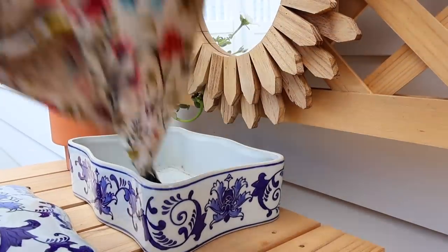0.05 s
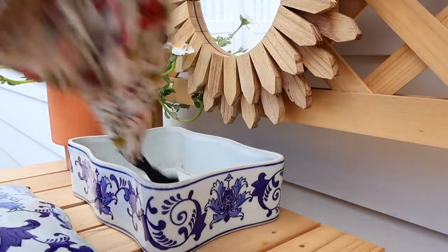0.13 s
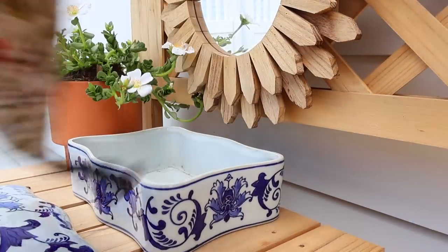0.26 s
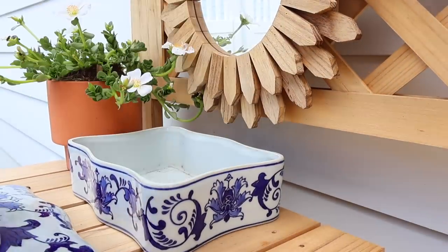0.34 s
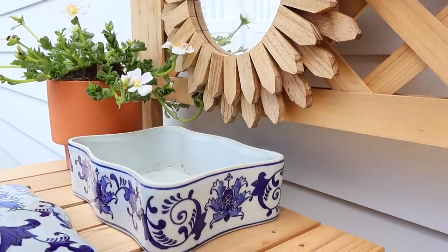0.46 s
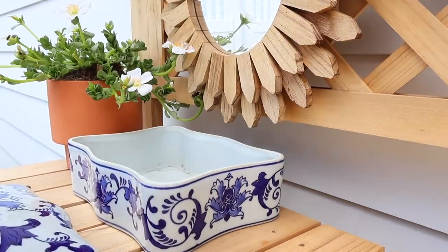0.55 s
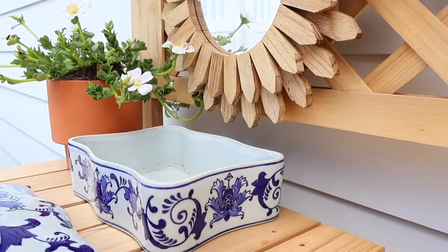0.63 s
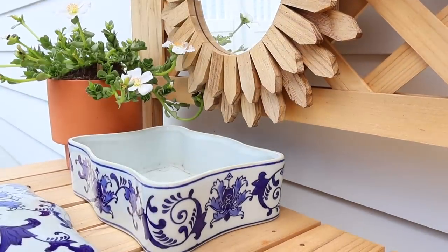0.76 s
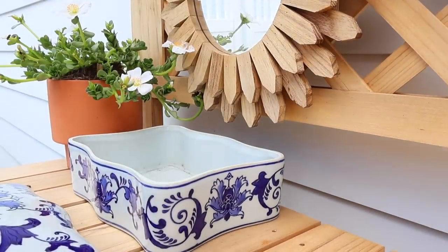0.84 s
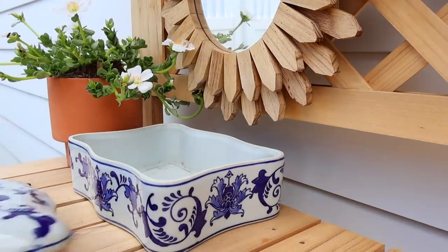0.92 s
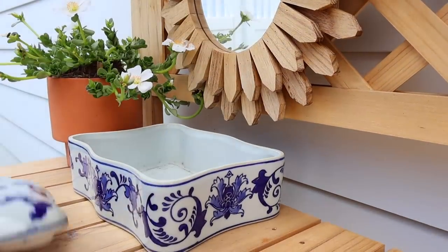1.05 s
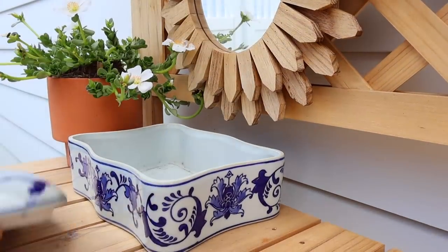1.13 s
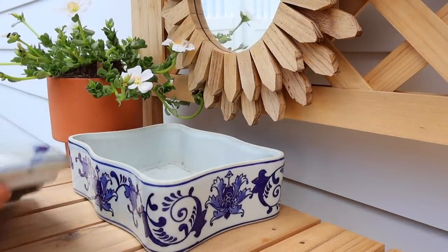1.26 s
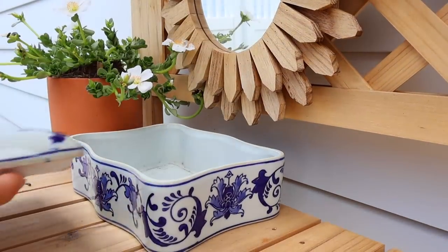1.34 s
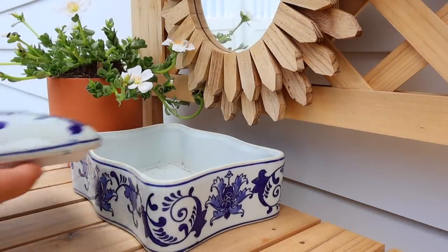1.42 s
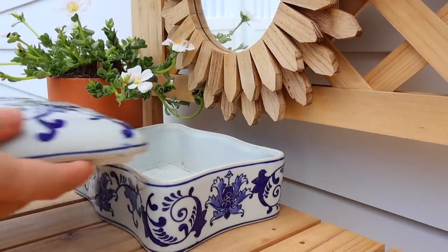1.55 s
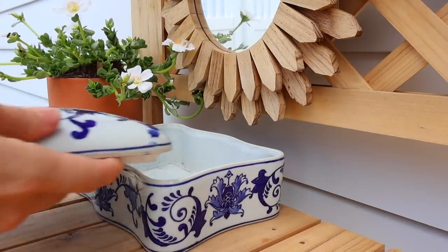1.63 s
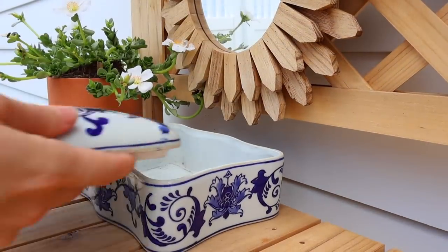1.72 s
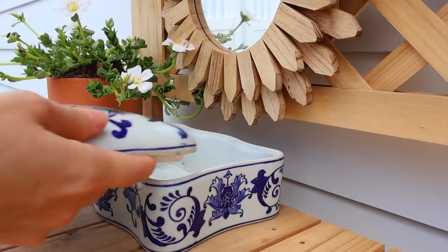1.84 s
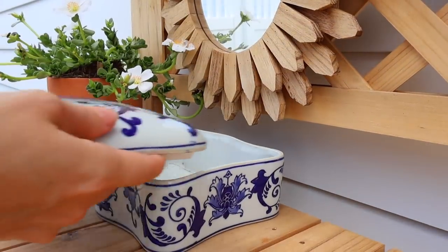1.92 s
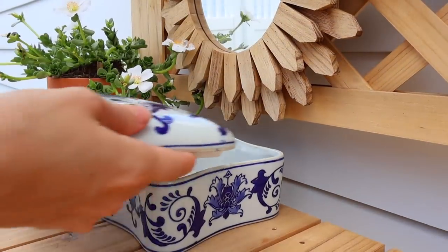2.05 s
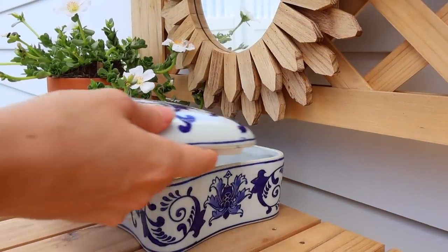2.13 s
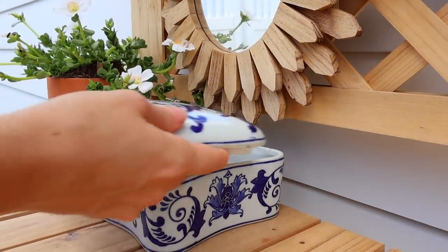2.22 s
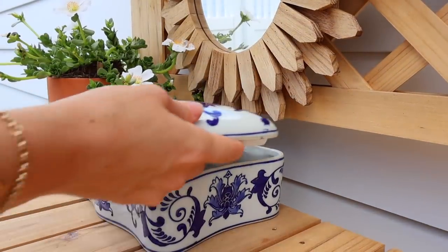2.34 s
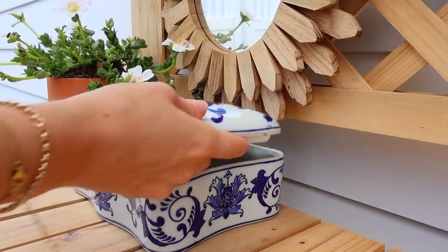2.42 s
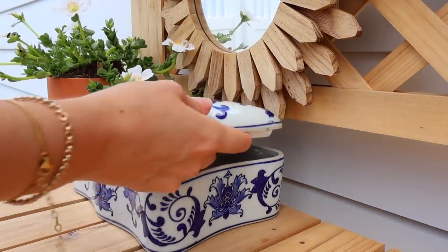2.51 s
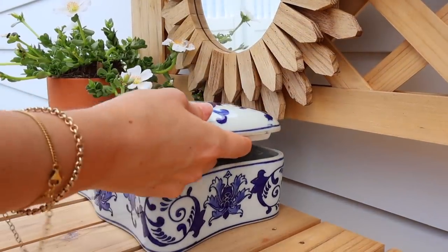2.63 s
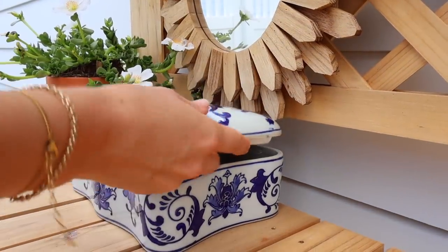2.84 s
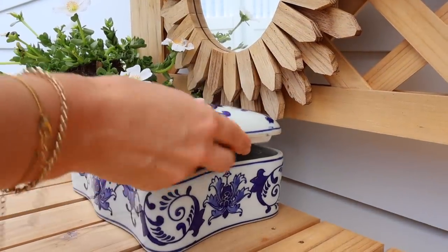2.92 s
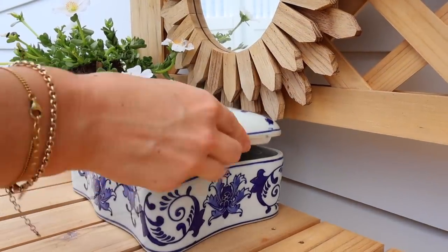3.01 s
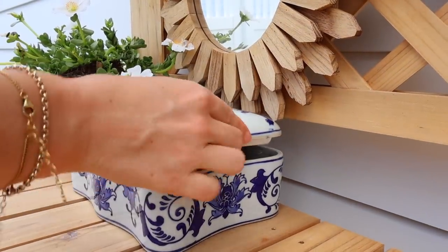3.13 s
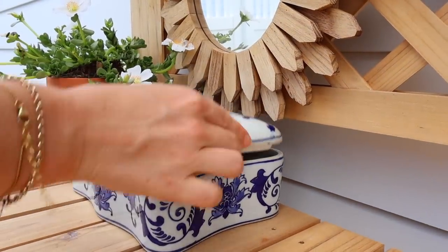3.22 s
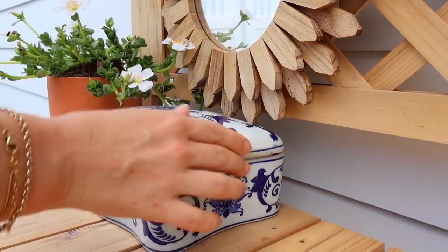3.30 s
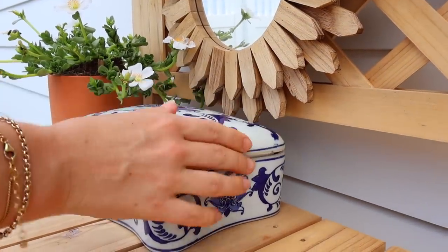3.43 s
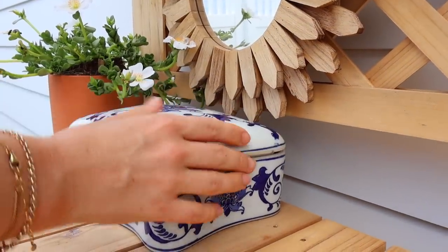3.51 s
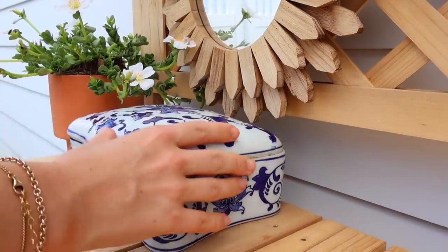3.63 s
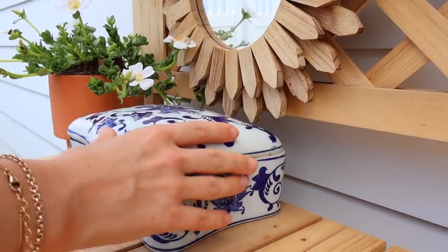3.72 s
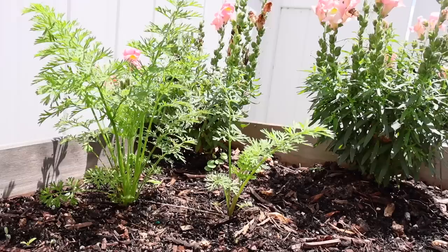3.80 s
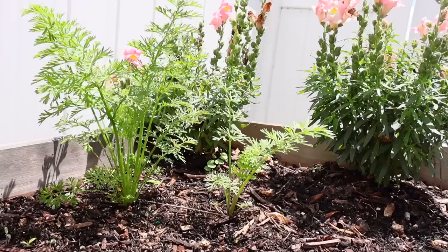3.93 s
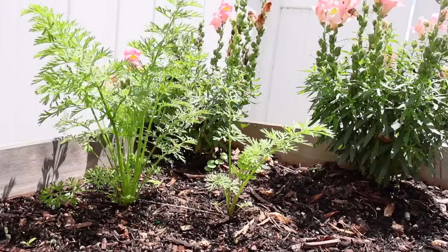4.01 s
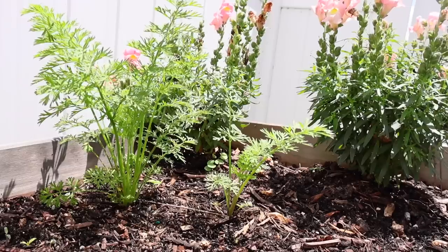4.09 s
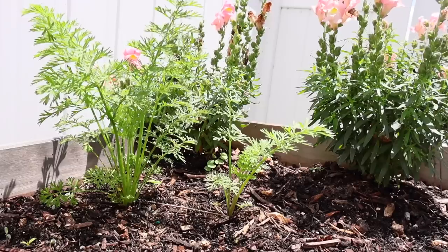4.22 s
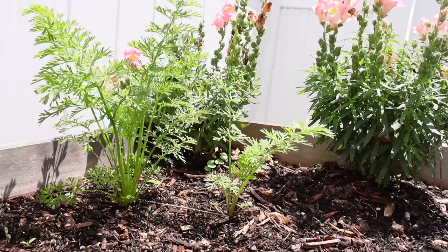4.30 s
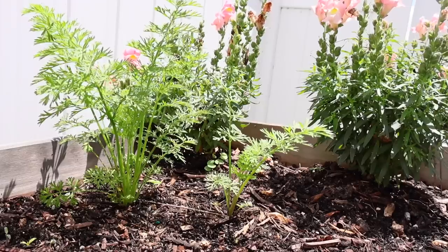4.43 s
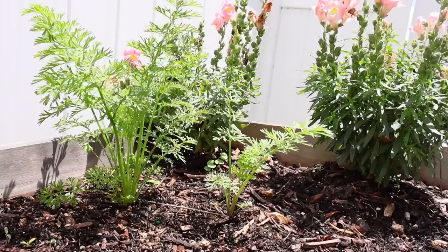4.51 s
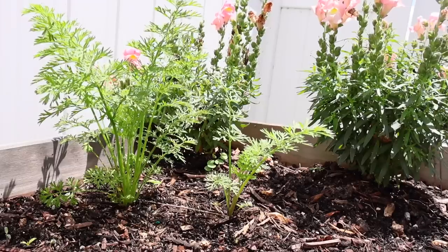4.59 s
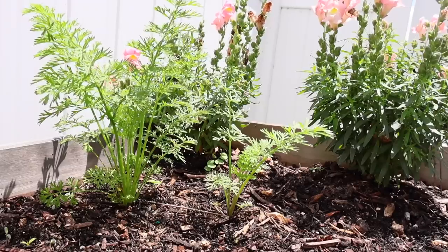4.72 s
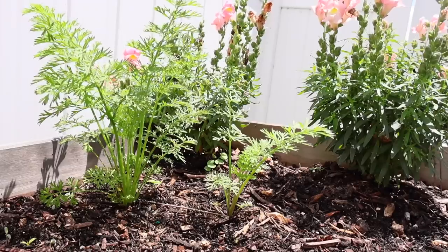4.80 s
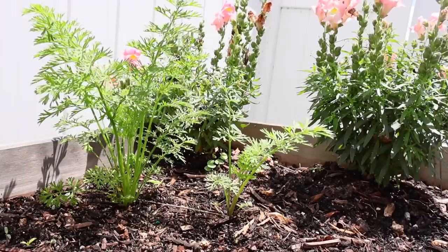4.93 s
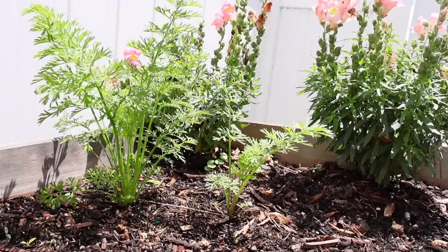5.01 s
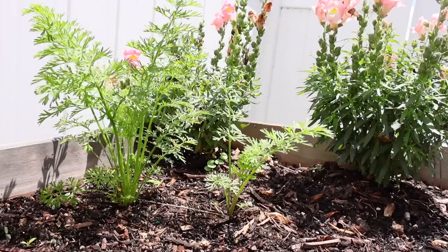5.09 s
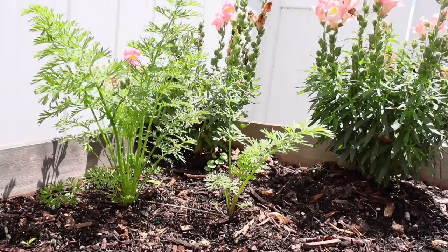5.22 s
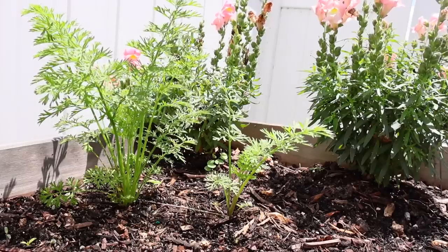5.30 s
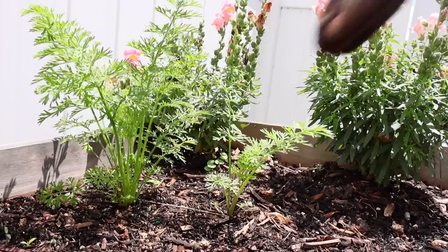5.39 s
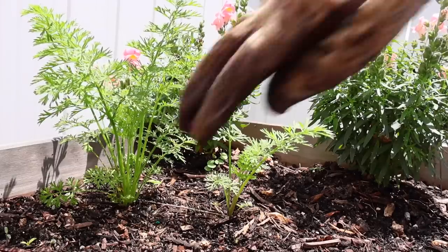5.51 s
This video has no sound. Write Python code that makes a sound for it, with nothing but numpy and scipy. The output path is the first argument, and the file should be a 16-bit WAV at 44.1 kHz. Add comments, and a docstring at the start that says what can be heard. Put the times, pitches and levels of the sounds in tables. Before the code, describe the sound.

Outdoors and close up, the air is very quiet at first, with tiny scuffs and faint ceramic ticks in the first half second. Around 0.9-1.3 s, dry soft scuffs and low bumps come from the wooden table as the lid is picked up, with weak taps near 1.4-1.5 s. At 1.7 s a loud, bright clink rings briefly, followed by a thin scrape and a light tap. Small knocks return from 2.5 s; strong double clacks hit near 2.9 s, then short gritty rim scrapes run on, slightly hollow. A heavy knock lands at 3.3 s, with more grating, and the lid clatters into its seat around 3.55-3.6 s, thumping the boards. Extremely faint, high, long chime notes linger far behind. At about 3.8 s the background switches abruptly to louder, steady garden air with a low distant drone around 90 Hz. From 5.4 s a barely audible dry rustle joins.

```python
"""A ceramic box on a wooden garden table: its lid clinks on the rim, scrapes along it in short strokes
and drops into its seat. Each contact rings decaying modes of box, lid and rim and thumps the table boards.
Trains of tiny slips drive the scrapes, and the dry scuffs of hand, tool and lid on the boards.
Behind it lies shaped noise of quiet garden air with a far chime of long sine notes; then comes
the louder air of a flower bed with a stronger distant drone and a last faint rustle of dense slips."""
import sys
import numpy as np
from scipy import signal
from scipy.fft import rfft, irfft, next_fast_len
from scipy.io import wavfile
from scipy.ndimage import uniform_filter1d, minimum_filter1d, map_coordinates

SR = 44100
rng = np.random.default_rng(int(sys.argv[2]) if len(sys.argv) > 2 else 0)


def digitize_waveform(pressure):
    """Quantize a signal to 16-bit integers and store it at the path in sys.argv[1].

    Rows of a 2-D input are taken as channels; values are limited to [-1, 1].
    """
    field = np.atleast_2d(pressure).T
    bounded = np.clip(field, -1, 1)
    quanta = np.round(bounded * 32767).astype(np.int16)
    wavfile.write(sys.argv[1], SR, quanta)


N = 244755

# Frequency ranges of a contact, in the order knock, clack, ring, sparkle: (low edge [Hz], high edge [Hz])
CONTACT_RANGES = [(280, 800), (800, 2500), (2500, 9000), (9000, 16000)]
# Modes of the air and walls of the nearly closed box: (frequency [Hz], relative level [dB], t60 [s])
HOLLOW_MODES = [(365, -7, .07), (402, 0, .09), (440, -9, .07)]
# The lid moves over the opening: (time [s], share covered [0-1])
LID_COVER = [(1.68, 0), (2.63, .45), (2.88, .6), (3.32, .8), (3.6, 1)]


def amp(db):
    """Level and amplitude: 20 dB are a factor of ten in gain."""
    return 10 ** (np.asarray(db) / 20)


def unit(x):
    """Normalization: divide by the root mean square, so that the rms is 1."""
    return x / np.sqrt(np.mean(x ** 2) + 1e-20)


def opening(x, size):
    """Normalization of a decaying sound: its first samples get rms 1."""
    return x / np.sqrt(np.mean(x[:, :size] ** 2) + 1e-20)


def along(points, hz):
    """Logarithmic frequency scale: (frequency [Hz], value) points joined by straight lines on a log axis."""
    f, v = np.transpose(points)
    return np.interp(np.log(hz + 1), np.log(f + 1), v)


def wobble(rate):
    """Slow fluctuation: a smooth curve through random knots, rate of them a second."""
    knots = rng.standard_normal(int(N * rate / SR) + 4)
    return map_coordinates(knots, [np.arange(N) * rate / SR])


def filtered(x, response):
    """Linear filtering: the spectrum is multiplied by a complex response of frequency."""
    size = x.shape[-1]
    padded = next_fast_len(size + 4096)
    hz = np.fft.rfftfreq(padded, 1 / SR)
    return irfft(rfft(x, padded) * response(hz), padded)[..., :size]


def band(x, edges, order=5):
    """Band-pass filtering: a causal Butterworth filter keeps what lies between the edges [Hz]."""
    return signal.sosfilt(signal.butter(order, edges, 'band', fs=SR, output='sos'), x)


def ports(x, lag_ms=0.037):
    """Interaural-like delay: a phase proportional to frequency lets the left channel lead the right."""
    lag = lag_ms / 1000
    lead = np.array([[1], [-1]])  # each channel is shifted by half the lag
    return filtered(x, lambda hz: np.exp(1j * np.pi * hz * lag * lead))


def add(track, s, sound):
    """Superposition: mix a stereo sound into the track at s seconds."""
    start = round(s * SR)
    track[:, start:start + sound.shape[1]] += sound


def air(spectrum, waver_db):
    """Diffuse noise: shaped random pressure, more alike left and right in the bass, wavering in level."""
    # Likeness of left and right: (frequency [Hz], correlation [0-1])
    likeness = [(60, 0.74), (180, 0.24), (550, 0.13), (1650, 0.19), (4970, 0.15), (15000, 0.33)]

    def response(hz):
        turn = np.arccos(np.clip(along(likeness, hz), -1, 1)) / 2  # mid-side angle giving this correlation
        return amp(along(spectrum, hz)) * [np.cos(turn), np.sin(turn)]

    mid, side = filtered(rng.standard_normal((2, N)), response)
    return unit(np.array([mid + side, mid - side])) * amp(waver_db * wobble(2))


def garden(drone_hz=90, drone_width_hz=7):
    """Superposed backgrounds: air, drone and chime by the table, then the louder air and drone of the bed."""
    # Spectra of the air by the table and at the flower bed: (frequency [Hz], relative density [dB per Hz])
    porch_spectrum = [(15, -45), (25, -9.5), (53, -9), (70, -4), (123, -2), (184, -10.5), (691, -16.5),
                      (749, -18), (1040, -18), (2150, -28), (2590, -24.5), (2970, -28.5), (15800, -37)]
    bed_spectrum = [(15, -42), (25, -11.5), (53, -14.5), (76, -10), (91, -3), (116, -13), (161, -13),
                    (189, -12.5), (222, -17), (791, -22.5), (2200, -32.5), (2390, -33.5), (4210, -36),
                    (14600, -42), (15800, -46)]
    move_s, crossfade_s = 3.83, 0.0078
    moved = np.clip((np.arange(N) / SR - move_s) / crossfade_s, 0, 1)
    resonance = lambda hz: 1 / (1 + ((hz - drone_hz) / drone_width_hz) ** 2)
    drone = unit(filtered(rng.standard_normal(N), resonance))
    porch = amp(-56.66) * air(porch_spectrum, waver_db=1.25) + amp(-70.5) * drone + chime()
    bed = amp(-49.75) * air(bed_spectrum, waver_db=0.37) + amp(-50) * drone
    return (1 - moved) * porch + moved * bed


def modes(table, t, spread):
    """Modal synthesis: decaying sines in stereo, with slightly new strengths and phases at every blow."""
    hz, db, t60 = np.transpose(table)[:, :, None]
    level, side, phase = rng.standard_normal((3, len(table), 1))
    ring = amp(db + level - 60 * t / t60) * np.sin(2 * np.pi * (hz * t + phase))
    return ring.sum(0) + spread * (side * ring).sum(0) * np.array([[1], [-1]])


def ceramic(lid_share, rim_share, clatter_db, width=0.4):
    """Modal density: sparse clear modes of box, lid and rim stand over a clatter of fast-decaying noise."""
    # Modes of the box walls, of the lid and of the lightly touched rim:
    # (frequency [Hz], relative level [dB], t60 [s])
    box_modes = [(716, -4, .09), (1352, 5, .075), (1712, -4, .11), (2000, -1, .08), (2078, -1, .13),
                 (2487, -2, .07), (2729, 1, .08), (2912, -2, .1), (3634, -5, .06), (3920, -5, .08),
                 (4151, -5, .09), (4280, -4, .08), (4603, -4, .07), (5464, -9, .07), (6013, -5, .08),
                 (7704, -9, .08)]
    lid_modes = [(1105, 0, .08), (1170, 1, .07), (2103, 2, .11), (2262, -1, .1), (2915, -7, .11),
                 (3095, -5, .08), (3190, -3, .14), (3913, -1, .15), (4533, 6, .1), (4760, -6, .13),
                 (5031, 3, .1), (5817, -1, .155), (6503, -2, .085), (6991, 7, .12), (7483, -6, .1),
                 (8608, -12, .13), (9857, -9, .1), (10760, -12, .11)]
    rim_modes = [(2912, -2, .16), (4151, -2, .14), (4592, 3, .15), (5480, -3, .19), (5814, -3, .11),
                 (7499, -2, .15), (7709, -3, .13), (8446, 2, .11)]
    # Spectrum of the clatter: (frequency [Hz], relative density [dB per Hz])
    clatter_spectrum = [(250, 2), (480, 1.5), (620, 3.5), (1150, -0.5), (2200, -7), (3100, 0.5), (3500, -3),
                        (4500, 0), (7000, -8), (9000, -8), (12500, -18.5), (15000, -13)]
    # Decay of the clatter: (frequency [Hz], t60 [s])
    clatter_decay = [(300, 0.19), (700, 0.052), (2000, 0.11), (6000, 0.12), (15000, 0.091)]
    free_rim_db, free_lid_db = 13.5, 3  # a freely ringing rim or lid has this much less clatter
    t = np.arange(SR // 3) / SR
    ring = np.zeros((2, len(t)))
    box_share = max(1 - lid_share - rim_share, 0)
    for share, table in [(box_share, box_modes), (lid_share, lid_modes), (rim_share, rim_modes)]:
        ring += np.sqrt(share) * modes(table, t, spread=0.35)

    hz, age, noise = signal.stft(rng.standard_normal((2, len(t))), SR, nperseg=128)
    fade_db = along(clatter_spectrum, hz)[:, None] - 60 * age / along(clatter_decay, hz)[:, None]
    mid, side = signal.istft(noise * amp(fade_db), SR, nperseg=128)[1][:, :len(t)]
    clatter = np.array([mid + width * side, mid - width * side])
    clear_db = free_rim_db * rim_share + free_lid_db * lid_share ** 2
    return ring + amp(clatter_db - clear_db) * clatter


def boards(centre_hz, focus_db=9, rise=0.0069):
    """Plate resonance: modes nearest centre_hz answer most (focus_db less per octave away) and swell in."""
    # Modes of the table boards:
    # (nominal frequency [Hz], relative level [dB], t60 [s], left gain [factor], right gain [factor])
    board_modes = [(55.43, -8.5, 0.38, 0.7, 0.5), (78, -4, 0.27, 0.31, 0.99), (98.14, 2, 0.4, 0.81, -0.27),
                   (116.8, -1.5, 0.33, 0.95, -0.29), (149.6, 0, 0.29, 0.018, 1), (200, 2, 0.18, 0.32, 0.68),
                   (247.7, 2.5, 0.21, .55, 0.9), (282.1, 2.5, .18, 0.57, 0.95)]
    t = np.arange(SR // 2) / SR
    out = np.zeros((2, len(t)))
    for hz, db, t60, left, right in board_modes:
        level, detune, phase = rng.standard_normal(3)
        drive_db = db + level - focus_db * abs(np.log2(hz / centre_hz))
        wave = np.sin(2 * np.pi * (hz * (1 + 0.023 * detune) * t + phase))
        out += np.outer([left, right], amp(drive_db - 60 * t / t60) * wave)
    return out * (1 - np.exp(-t / rise))


def slips(rate, spread_db, clump_db):
    """Stick-slip friction: a random train of tiny slips of uneven size that come in clumps, rms 1."""
    chance = rng.random(N)
    size = np.clip(rng.standard_normal(N), -2, 2)
    strength = amp(spread_db * size + clump_db * wobble(45))
    return unit((chance < rate / SR) * strength * rng.choice([-1, 1], N))


def strokes(table):
    """Friction envelopes of rubbing and table judder: each stroke takes hold, swells a little and dies away."""
    attack_s, swell_db_per_s = 0.016, 11  # the hand presses a little harder as a stroke goes on
    rub_release_s, judder_release_s = 0.13, 0.23  # time to fall 60 dB once the stroke stops
    now = np.arange(N) / SR
    rub, judder = np.zeros((2, N))
    for s, length, db, judder_db in table:
        age = now - s
        swell_db = swell_db_per_s * (np.clip(age, 0, length) - length / 2)
        press = np.clip(age / attack_s, 0, 1) * amp(swell_db)
        after = np.clip(age - length, 0, 1)
        # overlapping strokes add in power
        rub = np.hypot(rub, press * amp(db - 60 * after / rub_release_s))
        judder = np.hypot(judder, press * amp(judder_db - 60 * after / judder_release_s))
    return rub, judder


def scuffing():
    """Dense friction: dry slips too close together to tell apart make a shaped noise, rms 1."""
    # Spectrum of scuffing on wood, cloth and leaves: (frequency [Hz], relative density [dB per Hz])
    scuff_spectrum = [(1500, 4), (2500, -8.5), (3300, 0.5), (5500, -2.5), (8000, -6.5), (10000, -9),
                      (15000, -21)]
    dense = slips(rate=4400, spread_db=1.5, clump_db=1.5)
    return unit(filtered(dense, lambda hz: amp(along(scuff_spectrum, hz))))


def rubbed(body, edges, count=3):
    """Convolution: slips excite several spots of the edge, each with its own impulse response, rms 1."""
    out = np.zeros((2, N))
    for _ in range(count):
        ring = band(body(), edges, order=3)
        force = slips(rate=170, spread_db=4.5, clump_db=2)
        out += signal.oaconvolve(force[None], ring / np.linalg.norm(ring), axes=1)[:, :N]
    return unit(out)


def hollowness(s):
    """Cavity resonance: the air in the box resounds most when only a gap is left at time s, 0-1."""
    best_cover, width = 0.79, 0.2
    cover = np.interp(s, *np.transpose(LID_COVER))
    return np.exp(-((cover - best_cover) / width) ** 4)


def grinding():
    """Coupled wall and cavity modes: the low rubbing, with more of the air inside as the gap narrows."""
    t = np.arange(SR // 3) / SR
    walls = rubbed(lambda: ceramic(0.65, 0, clatter_db=16.5), (280, 2400), count=2)
    cavity = rubbed(lambda: modes(HOLLOW_MODES, t, spread=0.25), (220, 700), count=1)
    share = 0.3 * hollowness(np.arange(N) / SR)  # power share of the cavity
    return np.sqrt(1 - share) * walls + np.sqrt(share) * cavity


def sliding():
    """Friction-driven resonance: slips scuff dryly or ring the ceramic, and shake hollow and boards."""
    # Glaze scrapes along the rim, then dry scuffs of tool, hand and lid on the boards:
    # (start [s], length [s], mid-stroke level [dB], table judder [dB])
    scrape_strokes = [(.057, 0.025, -59, -61), (.11, .08, -55.5, -62), (1.75, 0.15, -57.5, -41.5),
                      (1.852, 0.04, -52.5, -44), (2.63, 0.036, -45, -25), (2.825, 0.048, -54.5, -42),
                      (2.9, 0.027, -36, -28), (2.94, .11, -51, -61), (3.058, .075, -41.5, -33),
                      (3.188, 0.067, -44.5, -37), (3.255, 0.072, -37, -34.5), (3.335, .04, -35, -22.5),
                      (3.39, 0.082, -54.5, -44), (3.542, 0.089, -35, -30.5), (3.65, .1, -51.5, -34)]
    scuff_strokes = [(0, 0.012, -61, -40.5), (.325, 0.032, -62.5, -66), (.515, .115, -69.5, -78),
                     (.908, 0.059, -46.5, -31.5), (.99, 0.084, -61.5, -34.5), (1.135, 0.035, -68, -39),
                     (1.198, .087, -58.5, -37.5), (2.485, 0.135, -70, -35)]
    # How strongly a slip along the rim drives the modes: (frequency [Hz], relative drive [dB])
    slip_drive = [(2500, 0), (3200, 4), (3600, -6.5), (4000, 1), (4700, -1), (5400, -4), (7000, -8.5),
                  (10000, 0)]
    usual_db, grind_growth = -50.5, 1.2  # grinding grows faster than the bright part of a scrape
    scrape_grind_db, scuff_grind_db = -5, 1  # grinding against the bright part; scrapes at the usual level
    scrape, scrape_judder = strokes(scrape_strokes)
    scuff, scuff_judder = strokes(scuff_strokes)
    pressure = scrape / amp(usual_db)
    scrape_grind = amp(usual_db + scrape_grind_db) * pressure ** grind_growth
    grind = scrape_grind + amp(scuff_grind_db) * scuff

    ringing = rubbed(lambda: ceramic(0.5, 0.3, clatter_db=13), (2500, 10500), count=2)
    ringing = unit(filtered(ringing, lambda hz: amp(along(slip_drive, hz))))
    jolts = slips(rate=460, spread_db=4, clump_db=0.5)
    shake = unit(signal.oaconvolve(jolts[None], boards(100, focus_db=12.5), axes=1)[:, :N])
    rubbing = grind * grinding() + scrape * ringing + scuff * scuffing()
    return ports(rubbing) + (scrape_judder + scuff_judder) * shake


def knock_colour(brightness, low_db):
    """Contact hardness: relative level of each range [dB], tilted above the clack by brightness per octave."""
    ring_db, sparkle_db = -6.5, -28.5  # against the clack, before the tilt
    centres = np.log2(CONTACT_RANGES).mean(1)
    octaves_above_clack = np.maximum(centres - centres[1], 0)
    return np.array([low_db, 0, ring_db, sparkle_db]) + brightness * octaves_above_clack


def contact(range_db, brightness, lid_share, rim_share, hollow_share, attack=0.00076):
    """Impact excitation: a level for each range; a softer contact favours the lower ringing modes."""
    t = np.arange(SR // 3) / SR
    struck = lambda x: opening(x, size=SR // 50)
    corner_hz = 8440 * 2 ** (brightness / 3)  # 3 dB per octave of brightness double the treble corner
    blow = ceramic(lid_share, rim_share, clatter_db=17) * (1 - np.exp(-t / attack))
    knock, clack, ring, sparkle = [struck(band(blow, edges)) for edges in CONTACT_RANGES]
    ring = struck(filtered(ring, lambda hz: 1 / (1 + 1j * hz / corner_hz) ** 2))
    cavity = struck(band(modes(HOLLOW_MODES, t, spread=0.22), (220, 700), order=2))
    knock = np.sqrt(1 - hollow_share) * knock + np.sqrt(hollow_share) * cavity
    return sum(amp(db) * part for db, part in zip(range_db, [knock, clack, ring, sparkle]))


def clinks():
    """Impact and coupled bodies: contacts ring the ceramic and thump the table, coloured by the lid's place."""
    # The lid knocks on the box: (time [s], level [dB], brightness [dB per octave],
    # low knock over the level [dB], table thump over the level [dB], lid share [0-1], rim share [0-1])
    knock_events = [(1.6812, -11, 0.9, -20.5, -8.5, 0, .1), (2.471, -42.5, 3, -2, 3, 0.17, .45),
                    (2.559, -57, 5, 12, 15, 0.5, .1), (2.628, -30, -2, 0, 1.5, .15, .04),
                    (2.702, -38.5, -3, 1.5, -1.5, 0.33, .15), (2.8648, -19.5, -3, -4, -6.5, .35, 0.5),
                    (2.89, -20, -0.93, -9, -8.5, 0.9, .02), (3.085, -36.5, 0.5, 4.5, 7.5, 0.7, 0.07),
                    (3.265, -43.5, 9, 11, 13, 0.5, .15), (3.323, -15.5, 0.5, -.5, -1.5, .2, 0.05),
                    (3.343, -28, 2.5, -17, 1, 0.3, 0.1), (3.571, -18, -1.7, -7, -6, 0.4, .02),
                    (3.5958, -18, 9, -9, -12, .85, .05), (3.61, -23.5, 8, -17, 3, 0.93, 0.2)]
    # Light touches that leave the rim free to ring: (time [s], level [dB], lid share [0-1])
    tap_events = [(.16, -55.5, 0), (.225, -52, 0), (1.387, -49, 0.6), (1.494, -55, .1), (1.529, -68, .2),
                  (1.885, -37.5, 0), (2.776, -53.5, 0.3), (3.131, -48.5, 0.5), (3.197, -49.5, 0.4),
                  (3.545, -47.5, 0.3)]
    # A tap's knock, clack, ring and sparkle ranges: (level over the tap's level [dB])
    tap_colour_db = np.array([-21, -16.5, -1.5, -12.5])
    tap_brightness, tap_thump_db, tap_freedom = 7, -10, 0.85  # dB per octave; dB over the level; 0-1
    thump_open_hz, thump_shut_hz = 154, 96  # the thump deepens as the box takes the lid's weight
    contacts = []
    for s, db, bright, low, thump, lid, rim in knock_events:
        contacts.append((s, db + knock_colour(bright, low), bright, db + thump, lid, rim))
    for s, db, lid in tap_events:
        rim = tap_freedom * (1 - lid)
        contacts.append((s, db + tap_colour_db, tap_brightness, db + tap_thump_db, lid, rim))

    china, wood = np.zeros((2, 2, N + SR))
    for s, range_db, brightness, thump_db, lid, rim in contacts:
        cover = np.interp(s, *np.transpose(LID_COVER))
        thump_hz = thump_open_hz + cover * (thump_shut_hz - thump_open_hz)
        add(china, s, contact(range_db, brightness, lid, rim, hollowness(s)))
        add(wood, s, amp(thump_db) * opening(boards(thump_hz), size=SR // 20))
    return ports(china[:, :N]) + wood[:, :N]


def chime(rise=0.045):
    """Lightly damped resonance: long thin notes of metal stirring far off, each one decaying sine."""
    # Chime notes: (time [s], frequency [Hz], level [dB], t60 [s])
    chime_notes = [(0.951, 2345, -66.5, 7.6), (1.08, 2612, -68.5, 6.9), (1.82, 2627, -63, 8.2),
                   (3.15, 2326, -56, 3.5)]
    t = np.arange(N) / SR
    out = np.zeros(N)
    for s, hz, db, t60 in chime_notes:
        age = np.maximum(t - s, 0)
        envelope = amp(db - 60 * age / t60) * (1 - np.exp(-age / rise))
        out += envelope * np.sin(2 * np.pi * hz * age)
    return out


def rustle():
    """Leaf friction: a faint rustle of dense slips rises as a gloved hand nears the plants."""
    start_s, rise_s, level_db = 5.38, 0.075, -63
    rise = np.clip((np.arange(N) / SR - start_s) / rise_s, 0, 1)
    return ports(amp(level_db) * rise * scuffing())


def scene():
    """Superposition: lid, box and table close by, the garden behind."""
    return clinks() + sliding() + rustle() + garden()


def record(dry):
    """Peak limiting: a fast look-ahead gain holds down the loudest peaks, and a band limit cuts the top."""
    ceiling_db, look_ahead_s, top_hz = -0.04, 0.003, 15850
    size = round(look_ahead_s * SR)
    needed = np.minimum(1, amp(ceiling_db) / (np.abs(dry).max(0) + 1e-9))
    gain = uniform_filter1d(minimum_filter1d(needed, 2 * size), size)
    return filtered(dry * gain, lambda hz: hz < top_hz)


dry = scene()
out = record(dry)
digitize_waveform(out)
```